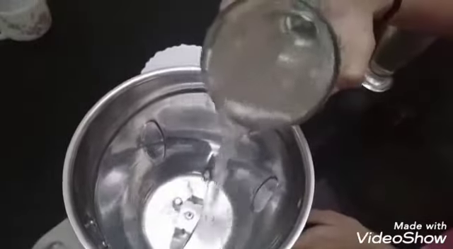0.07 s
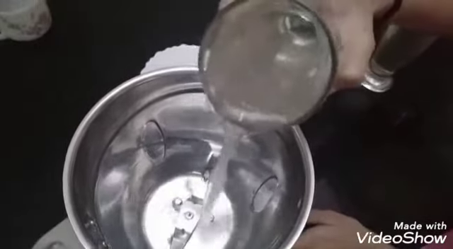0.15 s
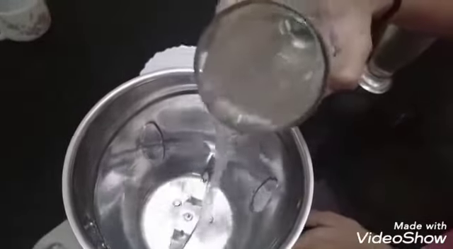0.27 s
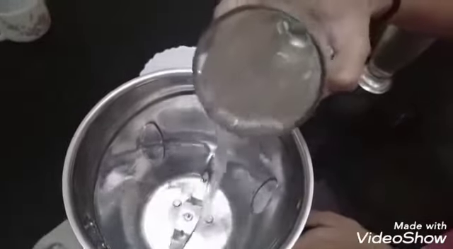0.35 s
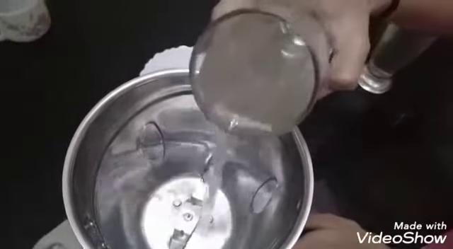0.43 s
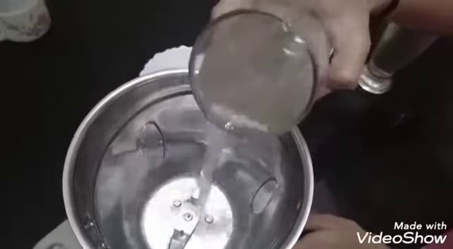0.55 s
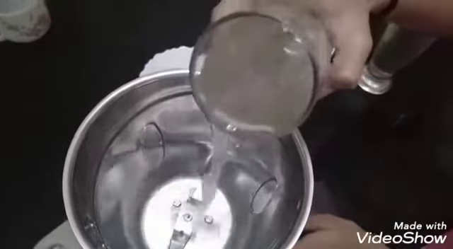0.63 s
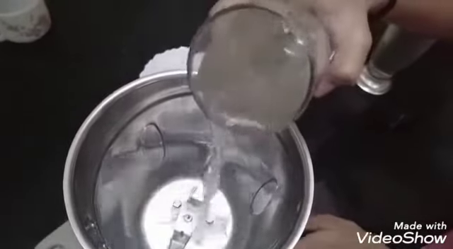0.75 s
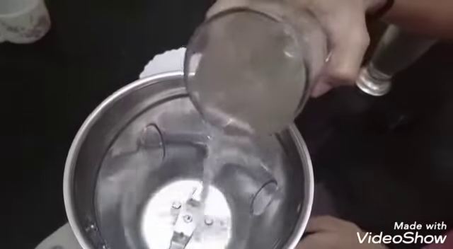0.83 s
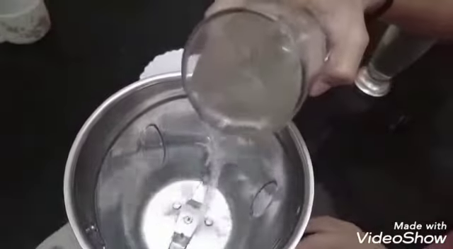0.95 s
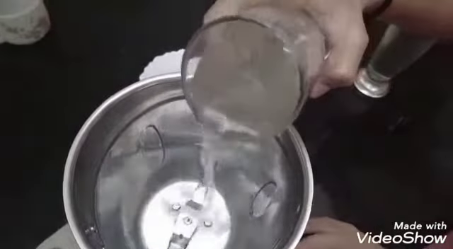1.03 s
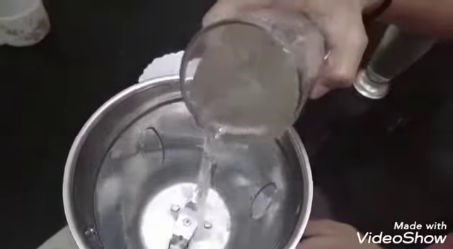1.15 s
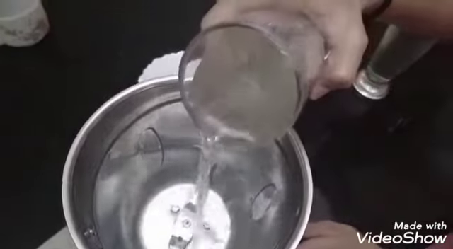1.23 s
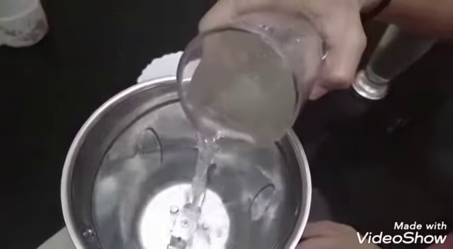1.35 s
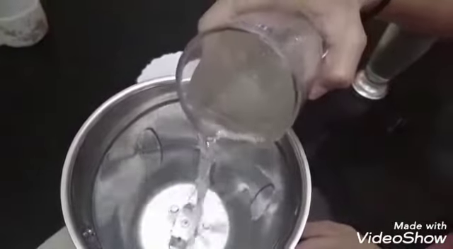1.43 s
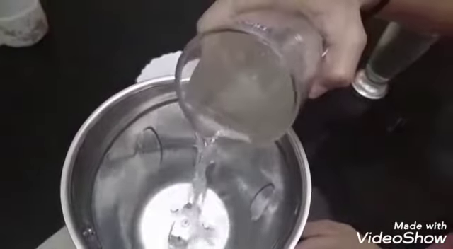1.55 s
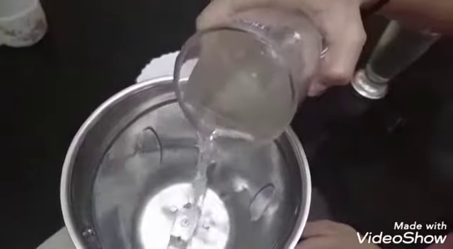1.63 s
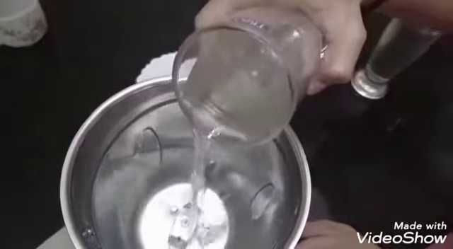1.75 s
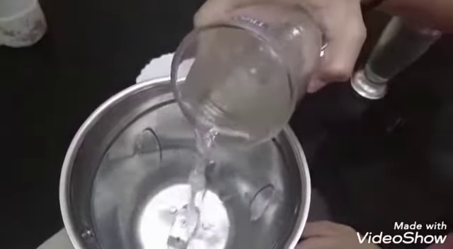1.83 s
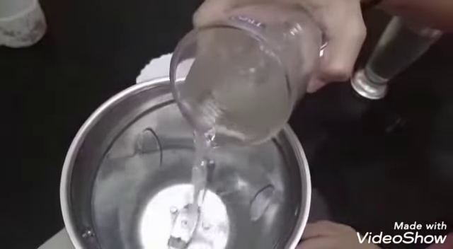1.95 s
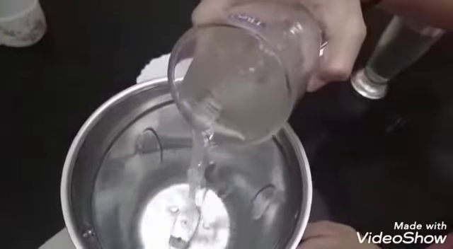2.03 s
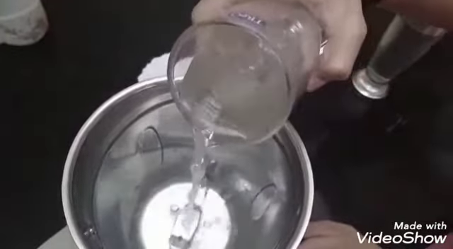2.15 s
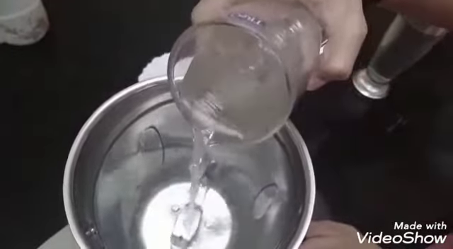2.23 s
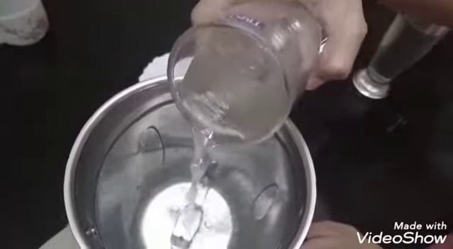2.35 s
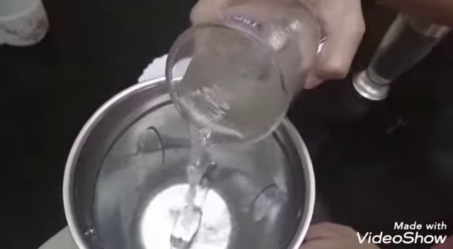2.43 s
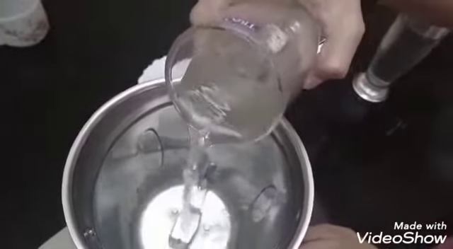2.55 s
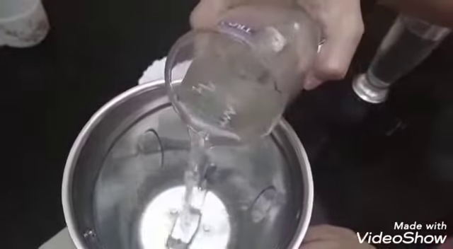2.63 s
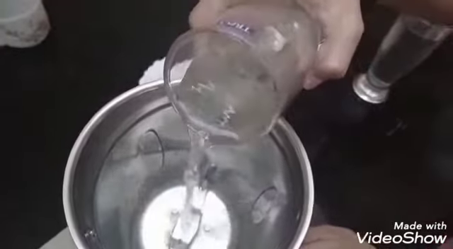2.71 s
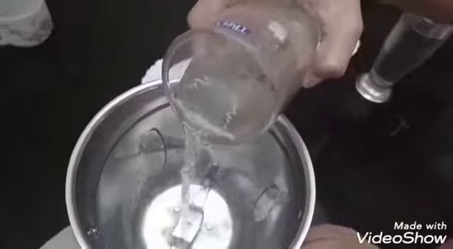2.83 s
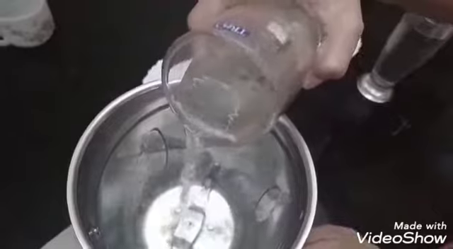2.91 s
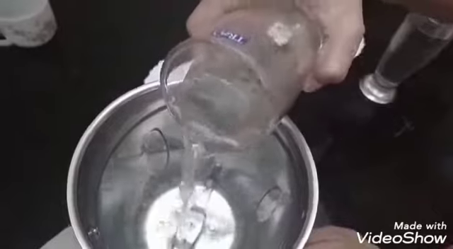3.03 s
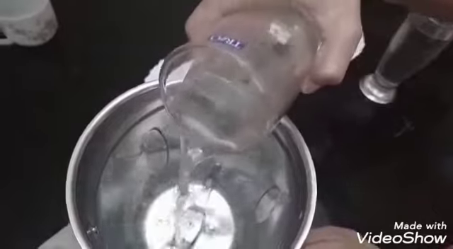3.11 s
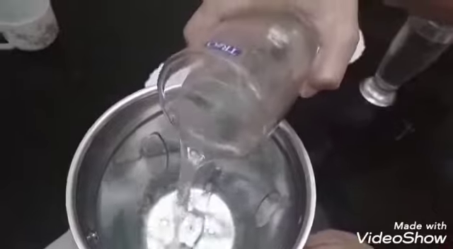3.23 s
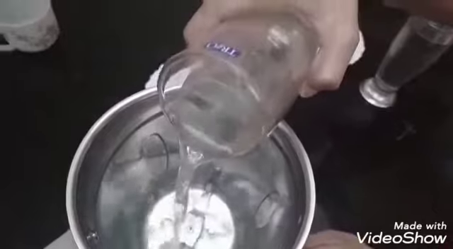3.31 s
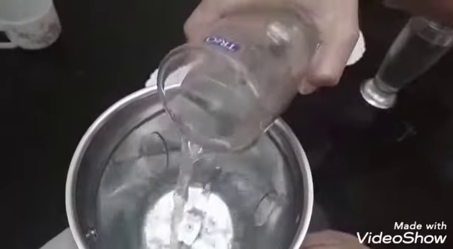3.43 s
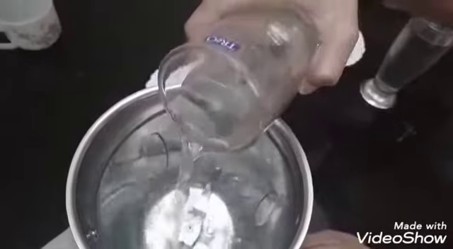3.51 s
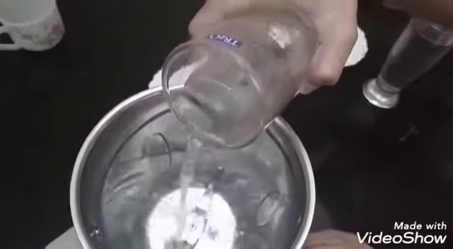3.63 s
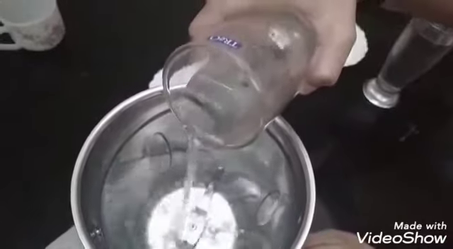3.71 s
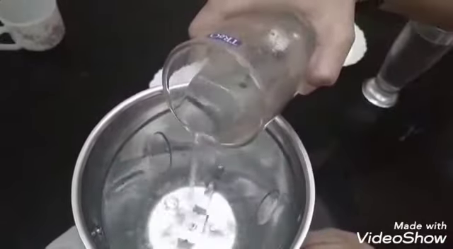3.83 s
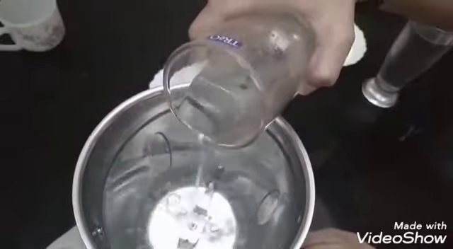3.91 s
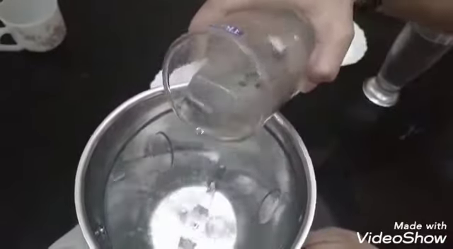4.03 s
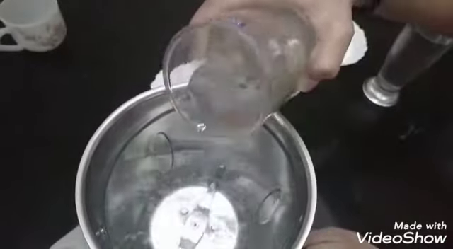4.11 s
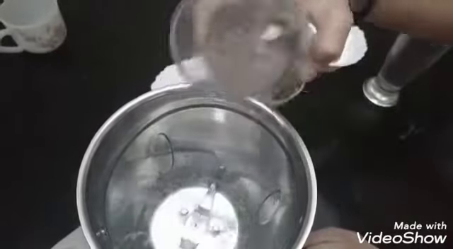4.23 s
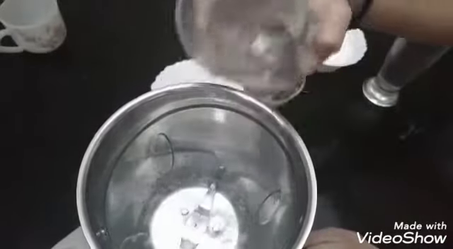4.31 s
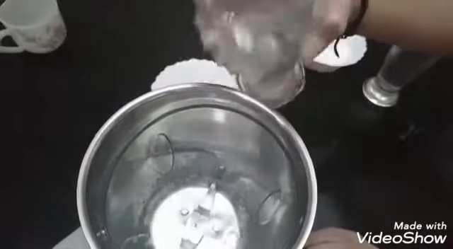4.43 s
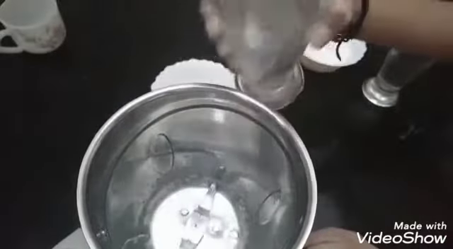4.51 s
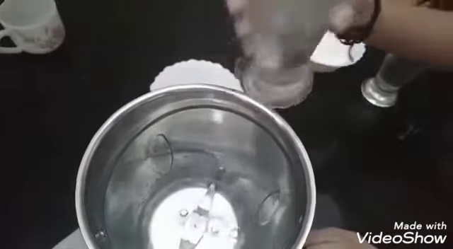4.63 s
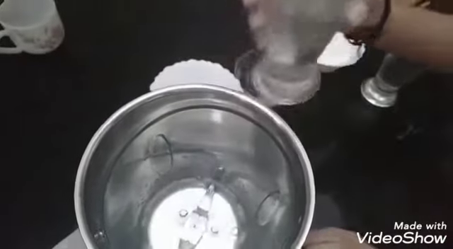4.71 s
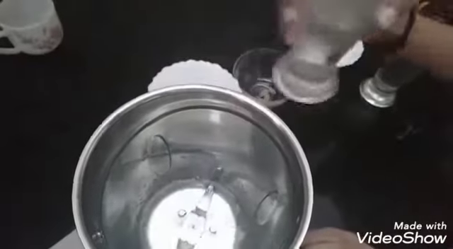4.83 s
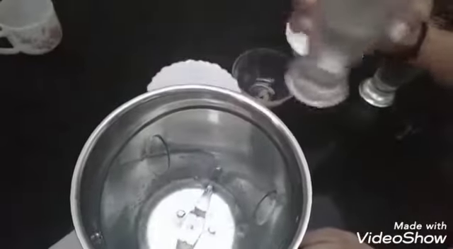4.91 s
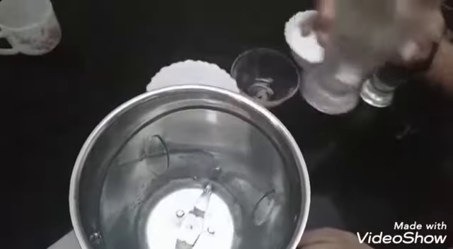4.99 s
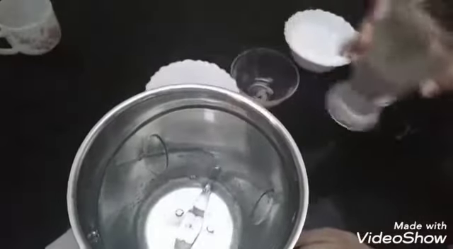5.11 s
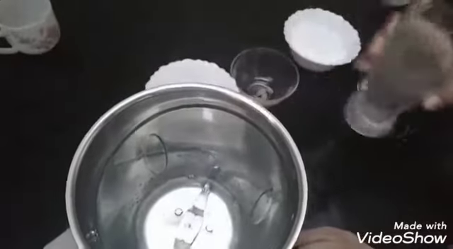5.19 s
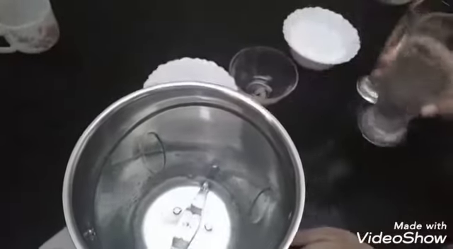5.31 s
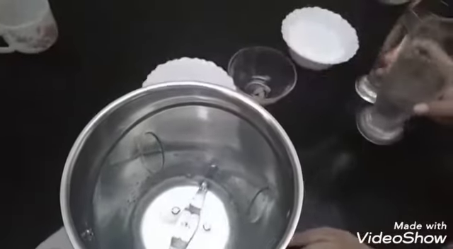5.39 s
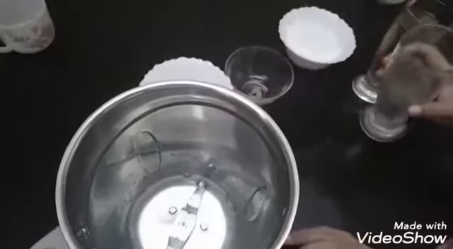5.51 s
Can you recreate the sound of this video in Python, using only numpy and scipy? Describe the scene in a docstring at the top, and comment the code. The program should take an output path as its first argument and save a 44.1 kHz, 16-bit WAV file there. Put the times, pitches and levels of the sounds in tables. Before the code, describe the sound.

Cold water pours from a glass into a steel blender jar, splashing brightly with sharp crackling bubble pops, then gulps and stops.

```python
"""Low kitchen noise and a narrow hiss run throughout. Cold water pours from a glass into a steel blender jar:
slugs and steady flow drum, splash and spray (showers of decaying sine bubbles, coloured by spectrum), while
small bubbles pop sharply and echo between the walls. Larger bubbles glide upward and the wall rings in places.
A last slug gulps, the flow dies away, tiny bubbles fizz out with a few late pops, and a soft brush follows."""
import sys
import numpy as np
from scipy import signal
from scipy.fft import rfft, irfft
from scipy.io import wavfile

SR = 44100
rng = np.random.default_rng(int(sys.argv[2]) if len(sys.argv) > 2 else 0)


def pcm_store(signal):
    """Save signal as 16-bit PCM."""
    levels = np.round(np.clip(np.atleast_2d(signal), -1, 1) * 32767)
    wavfile.write(sys.argv[1], SR, levels.astype(np.int16).T)


N = 244755
TIME = np.arange(N) / SR  # s
BINS = np.fft.rfftfreq(N, 1 / SR)  # Hz

# Room noise spectrum. Each row: frequency in Hz, relative density in dB.
ROOM_SPECTRUM = [(25, -15), (60, -17), (95, 2.5), (145, 4.5), (205, -2.5), (290, 7), (380, -2), (500, 2.5),
                 (800, -5.5), (1300, -10.5), (2300, -11.5), (3000, -9.5), (3700, -14.5), (4600, -13),
                 (5300, -61), (9000, -46)]
# Hiss spectrum. Each row: frequency in Hz, relative density in dB.
HISS_SPECTRUM = [(3000, -50), (5000, -22.5), (6200, -15.5), (6800, -2), (7300, 11.5), (7800, 10),
                 (8400, -6), (9200, -16), (10800, -21.5), (14300, -25)]
# Kitchen resonances. Each row: frequency in Hz, width in Hz, lift in dB.
KITCHEN_MODES = [(98, 10, 6), (145, 10, 5), (300, 22, 4), (484, 18, 6), (525, 18, 4), (667, 18, 7)]
# Background balance. Each row: frequency in Hz, left over right in dB.
ROOM_BALANCE = [(60, 21), (99, 14), (160, 10.5), (270, 17.5), (450, 1), (730, -2.5), (1210, 1), (2000, -4),
                (3300, -4), (5450, 7.5), (8990, 19), (14800, -1)]
# Likeness of the two channels. Each row: frequency in Hz, likeness from 0 to 1.
CHANNEL_LIKENESS = [(60, 0.86), (130, 0.5), (300, 0.89), (640, 0.29), (1300, 0), (15000, 0.07)]
# Balance of the stream. Each row: frequency in Hz, left over right in dB.
POUR_BALANCE = [(60, 6.5), (300, 9), (480, 3.5), (1000, -0.5), (3000, 0), (4500, -1), (5500, 6), (7200, 19),
                (8500, 9), (9600, -2.5), (12000, 3.5)]
# Weighting of the drumming. Each row: frequency in Hz, gain in dB.
DRUM_SPECTRUM = [(25, -8), (50, -6.5), (95, 1), (190, -3.5), (290, -1.5), (400, -4.5), (600, -4.5),
                 (900, -6), (1500, -6), (3000, -43)]
# Weighting of the splashing. Each row: frequency in Hz, gain in dB.
SPLASH_SPECTRUM = [(300, -10), (700, -4.5), (1100, -2.5), (1600, -1.5), (3200, 4), (4200, 5), (5500, -2),
                   (8000, -31), (14000, -3)]
# Weighting of the spray. Each row: frequency in Hz, gain in dB.
SPRAY_SPECTRUM = [(2500, -50), (4200, -10.5), (5200, -8.5), (6200, -2.5), (7300, 2), (8500, -1),
                  (9700, 1.5), (10700, -6), (12500, -5.5), (14300, -5.5)]
# Jar resonances. Each row: frequency in Hz, width in Hz, lift in dB.
JAR_MODES = [(1466, 90, 2), (1826, 120, 2), (2220, 90, 1), (2424, 80, 2), (2895, 90, 2), (3243, 120, 2)]
# Steady flow under the slugs. Each row: time in seconds, base splash level in dB, base spray level in dB.
STEADY_FLOW = [(0.0, -61.5, -41.5), (0.58, -56.5, -45.5), (0.81, -55.5, -42), (1.33, -44.5, -30.5),
               (1.43, -46.5, -36), (1.91, -46.5, -33.5), (2.03, -48, -37.5), (2.46, -48, -34),
               (2.67, -53.5, -43), (2.92, -55.5, -38.5), (3.04, -48, -35.5), (3.36, -44, -34),
               (3.68, -40, -27.5), (3.95, -41, -30), (4.09, -39.5, -28.5), (4.2, -55.5, -42),
               (4.4, -57, -47.5)]
# Slugs from the wavering glass; the first row is a splash already dying away as the sound begins. Each row:
# start in seconds, hold in seconds, splash gain in dB, # gain of the thump on the bottom in dB.
WATER_SLUGS = [(-0.01, 0.0086, -47, -49), (0.204, 0.02, -52.5, -70), (0.425, 0.055, -52, -49),
               (0.667, 0.072, -47.5, -47), (0.787, 0.022, -51, -42.5), (0.895, 0.041, -45, -40.5),
               (1, 0.059, -48, -41), (1.098, 0.049, -51, -44), (1.153, 0.044, -49.5, -44),
               (1.26, 0.039, -38.5, -37), (1.308, 0.021, -34, -41), (1.369, 0.098, -39.5, -41),
               (1.505, 0.068, -40, -45), (1.59, 0.032, -45.5, -43.5), (1.667, 0.086, -48, -42.5),
               (1.759, 0.041, -33.5, -48), (1.798, 0.023, -35, -40), (1.849, 0.043, -38.5, -46.5),
               (1.985, 0.079, -44.5, -50.5), (2.221, 0.071, -40, -35.5), (2.35, 0.025, -53, -47.5),
               (2.413, 0.02, -46, -41.5), (2.548, 0.063, -47.5, -45.5), (2.969, 0.06, -45, -41.5),
               (3.064, 0.057, -56, -44.5), (3.175, 0.18, -38.5, -39.5), (3.391, 0.1, -38, -40),
               (3.573, 0.022, -36, -37.5), (3.625, 0.054, -33.5, -41.5), (3.685, 0.1, -38, -41),
               (4.036, 0.025, -36.5, -36)]
# Loudest small bubbles bursting. Each row: start in seconds, peak of the channel mean in dB, pitch in Hz,
# left over right in dB.
LOUD_POPS = [(0.155, -25.5, 8150, 10.0), (0.2082, -21, 7770, 8), (0.2662, -22, 8200, 5.5),
             (0.3359, -16, 7420, 15), (0.4334, -16.5, 9600, 3), (0.4404, -18, 6290, -1),
             (0.472, -15.5, 7620, 17), (0.4836, -21, 7900, 7), (0.5125, -17, 9600, -1),
             (0.6554, -20, 8480, 5.0), (0.6911, -9.5, 7660, 6.0), (0.7193, -17.5, 10560, 9),
             (0.7332, -22, 8000, 8.5), (0.7567, -29, 7500, 6.5), (0.7781, -19.5, 7640, 8),
             (0.7865, -17, 6870, 11), (0.7906, -18, 9100, 4), (0.8611, -3, 7720, 12),
             (0.896, -4.5, 9600, 0.0), (0.9175, -12.5, 7300, 15), (0.9537, -19.5, 5900, 5.5),
             (0.9755, -3.5, 7400, 6), (1.0114, -14, 9570, -1), (1.0822, -1.5, 8880, 9),
             (1.1004, -19, 7000, 9.5), (1.1518, -9.5, 8000, 15), (1.1979, -9, 6900, 22),
             (1.251, -4.5, 7630, 2), (1.272, -15, 5600, 11), (1.272, -5, 7220, 5.5),
             (1.316, -12, 9400, 3.5), (1.326, -9, 9400, 4.0), (1.3435, -13, 9660, 6),
             (1.3748, -11, 9230, 1), (1.3742, -6, 7350, 14), (1.4268, -4, 7300, 20), (1.4548, -8, 6940, 14),
             (1.486, -0.5, 7420, 11), (1.486, 1, 8300, 7), (1.501, -11, 7240, 11), (1.509, -7, 8500, 8.5),
             (1.566, -6.5, 8440, 13), (1.5813, -4, 7740, 10), (1.6414, -20, 7900, 6.5),
             (1.6465, -2.5, 9830, 7.5), (1.702, -11.5, 9640, 2.5), (1.763, -16, 7250, 15),
             (1.7885, -10, 7700, 11), (1.8013, -7, 8800, 4.5), (1.8229, -7.5, 7770, 16),
             (1.8776, -12, 7270, 12), (2.0359, -9.5, 6800, 20), (2.0547, -21, 7640, 10),
             (2.1934, -5, 8440, 7), (2.2155, -7.5, 9830, 1), (2.2344, -6, 6140, 21),
             (2.2745, -7.5, 7550, 16), (2.4161, -6.5, 7440, 5), (2.557, -1.5, 7570, 8),
             (2.671, -21, 7800, 16), (2.905, -6, 8000, 11), (2.9552, -10, 8630, 3), (3.0006, -9.5, 8380, 6),
             (3.233, -12, 6900, 12), (3.297, -8.5, 9600, -2), (3.3677, -22, 10100, 5.0),
             (3.466, -8.5, 7250, 15), (3.496, -5, 7400, 18), (3.6898, -5, 6870, 16),
             (3.751, -10.5, 6900, 8), (3.905, -9, 7960, 6), (4.0056, -18, 6910, 18),
             (4.019, -4.5, 7360, 9.5), (4.0215, -0.5, 7440, 9), (4.0514, -12, 7240, 12),
             (4.0656, -5.5, 6300, 6), (4.118, -19.5, 7800, 9), (4.2771, -9.5, 6540, 8),
             (4.35, -29, 6770, 15.0), (4.7299, -23.5, 8300, 11), (4.76, -25.5, 7480, 14.0),
             (4.9031, -20, 8530, 9)]
# Large bubbles dragged under by a surge. Each row: time of fullest swell in seconds, level in dB,
# pitch in Hz, rise in octaves per cycle, ring time in cycles.
LARGE_BUBBLES = [(1.2938, -22.5, 1280, 0.059, 6.4), (1.319, -18, 2400, 0.025, 4.3),
                 (1.332, -16.5, 2650, 0.032, 3.1), (1.779, -17, 3700, 0.02, 2.7),
                 (1.794, -28, 1410, 0.087, 3), (1.824, -23, 1020, 0.09, 2), (1.867, -17, 2520, 0.0045, 4.5),
                 (1.978, -25.5, 1740, 0.031, 3), (3.591, -16, 2600, 0.027, 2.5),
                 (3.6556, -11, 2730, 0.065, 2), (3.9623, -17, 3220, 0.015, 4.2)]
# Drops on the bare steel. Each row: start in seconds, level in dB.
STEEL_DROPS = [(1.426, -18.5), (1.482, -19.5), (2.267, -19.5), (2.417, -10.5), (2.974, -22), (3.674, -32),
               (3.93, -21.5), (4.024, -19), (4.041, -13)]
# Weighting of the brush. Each row: frequency in Hz, gain in dB.
RUSTLE_SPECTRUM = [(2000, -28), (4500, -1), (7000, 4), (9000, -1), (12000, -42)]

FLOW_START_S, FLOW_FADE_S, FLOW_FADE_DB_PER_S = 0.205, 4.29, 36
SPLASH_DB, SPRAY_DB, DRUM_DB = 0.5, -1, -1.5  # against the flow; drumming follows splashing
CUSHION_DB_PER_S = 1.5  # the deepening pool softens the steady drumming
SLUG_ATTACK_S, SLUG_RELEASE_S = 0.011, 0.02
SLUG_SPRAY_DB = -4  # a slug throws less spray for its splash than the steady flow
FULL_SPRAY_DB, MIN_SHARE = -31, 0.5  # a weaker flow makes fewer bubbles, down to this share
SPLASH_WET_DB, SPLASH_T60_S = -2, 0.035
DROPLETS_DB = -2  # stray droplets in the spray mix
WALL_HZ = 4687
WALL_DB, WALL_DB_PER_S = -13.5, 2.5  # against splashing; the stream shakes it more as the glass tips
STREAM_END_S, DULL_FROM_S, DULL_S, DULL_HZ = 4.13, 2.86, 1.8, 10800
GURGLE_DB, GURGLE_DB_PER_S = -13.5, 2  # against splashing; more as the pool deepens
POP_PEAK_DELAY_S, POP_RISE_S, POP_RING_S = 0.002, 0.00017, 0.00017
POP_FAR_DB, POP_FAR_T60_S = -16, 0.2
SMALL_PER_S, SMALL_DB, SMALL_SPREAD_DB = 26, 11, 1.5
SMALL_FOLLOW_DB_PER_DB = 1  # pop level per dB of spray
SMALL_HZ, SMALL_SPREAD_OCT = 7970, 0.23
EDGE_HZ = 14400


def amp(db):
    """Decibels to gain."""
    return 10 ** (np.asarray(db) / 20)


def unit(x):
    """Scales to rms 1."""
    return x / np.sqrt(np.mean(x ** 2) + 1e-20)


def along(points):
    """Interpolates a table over log frequency at every bin."""
    hz, value = np.transpose(points)
    return np.interp(np.log(BINS + 1), np.log(hz + 1), value)


def lifts(modes):
    """Sums the decibels that resonances add at every bin."""
    return sum(db / (1 + (2 * (BINS - hz) / width_hz) ** 2) for hz, width_hz, db in modes)


def colour(pair, shape_db, balance):
    """Weights the spectra of two unrelated signals and sets their likeness and balance; mean has deviation 1."""
    left, other = rfft(pair)
    same = np.clip(along(CHANNEL_LIKENESS), -1, 1)
    right = same * left + np.sqrt(1 - same ** 2) * other
    ratio = amp(along(balance))
    spectra = np.array([ratio * left, right]) / np.hypot(ratio, 1)
    out = irfft(spectra * amp(shape_db), N)
    return out / np.std(out.mean(0))


def add(mix, start_s, sound):
    """Mixes a stereo sound in at a time."""
    part = mix[:, max(round(start_s * SR), 0):][:, :sound.shape[1]]
    part += sound[:, :part.shape[1]]


def echoes(t60_s, size=4000):
    """Dense decaying reflections between steel walls, different in each channel, energy 1."""
    t = np.arange(size) / SR
    tail = rng.standard_normal((2, size)) * amp(-60 * t / t60_s) * (t > .0006)
    return tail / np.linalg.norm(tail, axis=1, keepdims=True)


def in_jar(x, wet_db, t60_s):
    """Direct sound plus its echoes in the jar."""
    return x + amp(wet_db) * signal.oaconvolve(x, echoes(t60_s), axes=1)[:, :N]


def bubble(hz, phase_turns, cycles, glide, size):
    """An air pocket swells into ringing, rises a little in pitch and dies away."""
    age = (TIME[:size] * hz / max(cycles, .3)).astype(np.float32)
    pitch_hz = hz * (1 + glide * (np.minimum(age, 4) - 1))
    turns = np.cumsum(pitch_hz / SR, axis=-1) + phase_turns
    return age * np.exp(1 - age) * np.sin(2 * np.pi * turns.astype(np.float32))


def patter(per_s, spread_db, low_hz, high_hz, cycles, size=300, thinning=1, glide=0.062):
    """A shower of bubbles of random pitch and size; a weak flow breaks into fewer unless thinning is 0."""
    when, pitch, bulk, phase, luck, tilt, flip = rng.random((int(per_s * N / SR), 7)).T
    share = np.clip(amp(thinning * (flow(when * N / SR)[1] - FULL_SPRAY_DB)), MIN_SHARE, 1)
    weight = amp(spread_db * np.minimum(-np.log(1 - bulk), 3.5)) / np.sqrt(share)
    keep = luck < share
    hz = low_hz * (high_hz / low_hz) ** pitch[keep, None]
    grains = hz * weight[keep, None] * bubble(hz, phase[keep, None], cycles, glide, size)
    where = ((when[keep, None] * N).astype(int) + np.arange(size)).ravel() % N
    lean = tilt[keep, None] - .5
    polarity = np.sign(flip[keep, None] - .5)
    sides = (1 + lean, polarity * (1 - lean))
    return unit(np.array([np.bincount(where, (grains * side).ravel(), N) for side in sides]))


def gusts(per_s):
    """Smooth random wavering of rms 1: the stream breaks into lumps."""
    return unit(irfft(rfft(rng.standard_normal(N)) * np.exp(-(BINS / per_s) ** 2), N))


def background(room_db=-50, hiss_db=-46.5):
    """Low kitchen noise and a narrow, steady hiss, both shaped from white noise."""
    room = colour(rng.standard_normal((2, N)), along(ROOM_SPECTRUM) + lifts(KITCHEN_MODES), ROOM_BALANCE)
    hiss = colour(rng.standard_normal((2, N)), along(HISS_SPECTRUM), ROOM_BALANCE)
    return amp(room_db) * room + amp(hiss_db) * hiss


def flow(t):
    """Base splash and spray levels in dB: 14 dB lower before the flow starts, dying away at the end."""
    s, *levels_db = np.transpose(STEADY_FLOW)
    before_db = np.where(t < FLOW_START_S, -14, 0)
    fade_db = before_db - FLOW_FADE_DB_PER_S * np.maximum(t - FLOW_FADE_S, 0)
    return [np.interp(t, s, level_db) + fade_db for level_db in levels_db]


def slugs():
    """Gains of splash and thump: each slug lands quickly, holds while it falls and dies away."""
    splash, thump = np.zeros((2, N))
    for start_s, hold_s, splash_db, thump_db in WATER_SLUGS:
        attack = np.clip((TIME - start_s) / SLUG_ATTACK_S, 0, 1)
        shape = attack * np.exp(-np.maximum(TIME - start_s - hold_s, 0) / SLUG_RELEASE_S)
        splash += amp(splash_db) * shape
        thump += amp(thump_db) * shape
    return splash, thump


def churn(x, patchy_db, width_hz, length_s):
    """The shifting water surface favours ever-changing patches of pitch."""
    hz, t, z = signal.stft(x, SR, nperseg=256, noverlap=192)
    field = rng.standard_normal(z.shape[1:])
    across = np.exp(-((hz - hz.mean()) / width_hz) ** 2)
    during = np.exp(-((t[:41] - t[20]) / length_s) ** 2)
    field = unit(signal.fftconvolve(field, np.outer(across, during), "same"))
    out = signal.istft(z * amp(patchy_db * field), SR, nperseg=256, noverlap=192)[1]
    return unit(out[:, :N])


def drumming():
    """Water drums on the bottom: short low bubbles, with longer air pockets burbling."""
    hits = patter(per_s=2000, spread_db=1.0, low_hz=115.0, high_hz=1320, cycles=0.28, size=600, thinning=0)
    burble = patter(per_s=110, spread_db=1.5, low_hz=229.5, high_hz=918, cycles=2.17, size=2400, thinning=0)
    return colour(hits + amp(-4) * burble, along(DRUM_SPECTRUM) + lifts(KITCHEN_MODES), POUR_BALANCE)


def splashing():
    """Water splashes in the pool: short bubbles, with larger ones ringing on."""
    short = patter(per_s=1600, spread_db=-0.5, low_hz=608, high_hz=10900, cycles=0.41)
    ringing = patter(per_s=800, spread_db=0.0, low_hz=811, high_hz=6050, cycles=4.1, size=800)
    splash = in_jar(short + amp(-7.0) * ringing, SPLASH_WET_DB, SPLASH_T60_S)
    splash = churn(splash, patchy_db=3.0, width_hz=220, length_s=0.032)
    return colour(splash, along(SPLASH_SPECTRUM) + lifts(JAR_MODES), POUR_BALANCE)


def spraying():
    """Droplets tick on the wall, tiny bubbles fizz and stray droplets tick sharply."""
    ticks = patter(per_s=2800, spread_db=3.0, low_hz=3690, high_hz=14000, cycles=0.71, thinning=0)
    fizz = patter(per_s=1500, spread_db=5.0, low_hz=4700, high_hz=15000, cycles=2.13)
    stray = patter(per_s=160, spread_db=5.5, low_hz=5560, high_hz=13000, cycles=0.46, size=100)
    spray = in_jar(amp(2.5) * ticks + fizz, wet_db=2.5, t60_s=0.058) / 2
    spray = spray + amp(DROPLETS_DB) * in_jar(stray, wet_db=-3.5, t60_s=0.03)
    spray = churn(spray, patchy_db=4.0, width_hz=180, length_s=0.0029)
    return colour(spray, along(SPRAY_SPECTRUM) + lifts(JAR_MODES), POUR_BALANCE)


def wall_ring(splash, width_hz=90, fitful_db=5, fits_per_s=16):
    """The splashing fitfully catches the steel wall and sets its note ringing."""
    ring = irfft(rfft(splash) / (1 + 2j * (BINS - WALL_HZ) / width_hz) ** 2, N)
    return unit(ring * amp(fitful_db * gusts(fits_per_s))) * amp(WALL_DB + WALL_DB_PER_S * TIME)


def dulled(spray):
    """The pool swallows the droplets: crossfades the spray to a low-passed copy."""
    dull = irfft(rfft(spray) / (1 + (BINS / DULL_HZ) ** 8), N)
    return spray + np.clip((TIME - DULL_FROM_S) / DULL_S, 0, 1) * (dull - spray)


def stream():
    """Lumps of water drum on the bottom, splash in the pool and throw spray at the wall."""
    splash_db, spray_db = flow(TIME)
    slug, thump = slugs()
    lumps = gusts(per_s=25)
    splash = splashing()
    drum_gain = np.hypot(amp(splash_db + DRUM_DB - CUSHION_DB_PER_S * TIME), thump)
    splash_gain = np.hypot(amp(splash_db + SPLASH_DB), slug)
    slug_spray = amp(spray_db - splash_db + SLUG_SPRAY_DB) * slug
    spray_gain = np.hypot(amp(spray_db + SPRAY_DB), slug_spray)
    return (drumming() * drum_gain * amp(0.3 * lumps)
            + (splash + wall_ring(splash)) * splash_gain * amp(0.48 * lumps)
            + dulled(spraying()) * spray_gain * amp(2.25 * lumps))


def gurgling():
    """The deepening pool swallows more and more large bubbles, a dense, rough crowd."""
    bubbles = patter(per_s=300, spread_db=2.5, low_hz=1306, high_hz=2430, glide=0.066, cycles=4.45, size=900)
    bubbles = colour(in_jar(bubbles, SPLASH_WET_DB, SPLASH_T60_S), lifts(JAR_MODES), POUR_BALANCE)
    splash_gain = np.hypot(amp(flow(TIME)[0]), slugs()[0])
    return bubbles * splash_gain * amp(GURGLE_DB + GURGLE_DB_PER_S * TIME)


def pop(hz, side_db, glide=0.0336, snap_db=-20, snap_s=0.004, near_db=-8, near_t60_s=0.016):
    """One bubble swells, snaps and rattles between the walls; the channel mean peaks at 1."""
    bright = signal.butter(3, [6500, 11500], "band", fs=SR, output="sos")
    t = TIME[:900] - POP_PEAK_DELAY_S
    swell = np.exp(-np.logaddexp(-t / POP_RISE_S, t / POP_RING_S))
    turns = np.cumsum(hz * (1 + glide * np.tanh(t / POP_RING_S))) / SR + rng.random()
    # a quarter turn apart in the two channels
    ring = swell * np.array([np.cos(2 * np.pi * turns), np.sin(2 * np.pi * turns)])
    snap_shape = np.exp(-np.logaddexp(-t / POP_RISE_S, t / snap_s))
    snap = signal.sosfilt(bright, rng.standard_normal(ring.shape) * snap_shape)
    paths = amp(near_db) * echoes(near_t60_s) + amp(POP_FAR_DB) * echoes(POP_FAR_T60_S)
    paths[:, 0] = 1  # direct sound
    balance = np.array([[amp(side_db)], [1]])
    sound = balance * signal.fftconvolve(ring + amp(snap_db) * snap, paths, axes=1)
    return sound / abs(sound.mean(0)).max()


def pops():
    """The loudest small bubbles burst sharply."""
    out = np.zeros((2, N))
    for start_s, db, hz, side_db in LOUD_POPS:
        add(out, start_s, amp(db) * pop(hz, side_db))
    return out


def side_at(hz):
    """Left over right in dB that the jar gives a sound of this pitch."""
    return np.interp(hz, BINS, along(POUR_BALANCE))


def small_pops(count=160):
    """Lesser bubbles burst at random through the pour, their level following the spray."""
    out = np.zeros((2, N))
    times_s = FLOW_START_S + np.cumsum(rng.uniform(0, 2, count)) / SMALL_PER_S
    loud, pitch = rng.standard_normal((count, 2)).T
    levels_db = SMALL_FOLLOW_DB_PER_DB * flow(times_s)[1] + SMALL_DB + SMALL_SPREAD_DB * loud
    pitches_hz = SMALL_HZ * 2 ** (SMALL_SPREAD_OCT * pitch)
    for start_s, db, hz, side_db in zip(times_s, levels_db, pitches_hz, side_at(pitches_hz)):
        if start_s < STREAM_END_S:
            add(out, start_s, amp(db) * pop(hz, side_db))
    return out


def glugs():
    """A large bubble swells into ringing and glides upward as it nears the surface."""
    out = np.zeros((2, N))
    for peak_s, db, hz, rise_oct, cycles in LARGE_BUBBLES:
        turns = np.arange(-2 * cycles, 4 * cycles, hz / SR)
        swell = np.where(turns < 0, np.exp(-(turns / cycles) ** 2), 1 / np.cosh(turns / cycles))
        phase = np.cumsum(2 ** (rise_oct * np.minimum(turns, cycles))) * hz / SR
        ring = swell * np.sin(2 * np.pi * (phase + np.array([[0], [.15]])))
        add(out, peak_s - 2 * cycles / hz, amp(db) / 2 * ring)
    return in_jar(out, wet_db=-1.5, t60_s=0.081)


def pings(t60_s=0.02, rise_s=0.00013, tick_db=-6, tick_s=0.00022):
    """A drop ticks on the wet steel wall, which rings briefly on one note."""
    out, t = np.zeros((2, N)), TIME[:4000]
    fade = (1 - np.exp(-t / rise_s)) * amp(-60 * t / t60_s)
    ring = fade * np.sin(2 * np.pi * (WALL_HZ * t + np.array([[0], [.2]])))
    band = signal.butter(2, [2500, 7000], "band", fs=SR, output="sos")
    for start_s, db in STEEL_DROPS:
        tick = signal.sosfilt(band, rng.standard_normal((2, len(t))) * np.exp(-t / tick_s))
        add(out, start_s, amp(db) * (ring + amp(tick_db) * 2 * tick))
    return out


def gulp(start_s=4.044, hz=285, cycles=3.1, db=-27):
    """The last slug of water traps one big pocket of air, heard mostly on the left."""
    out = np.zeros((2, N))
    pocket = bubble(hz, rng.random(), cycles, glide=0.064, size=SR // 10)
    add(out, start_s, amp(db) * np.outer([1, .5], pocket))
    return out


def settling(db=-44, fade_db_per_s=24):
    """After the stream ends, the last tiny bubbles in the pool fizz out."""
    bubbles = patter(per_s=300, spread_db=7.0, low_hz=5700, high_hz=9100, cycles=1.4, size=500, thinning=0)
    bubbles = colour(in_jar(bubbles, SPLASH_WET_DB, SPLASH_T60_S), 0, POUR_BALANCE)
    age_s = TIME - STREAM_END_S
    return bubbles * (age_s > 0) * amp(db - fade_db_per_s * np.maximum(age_s, 0))


def rustle(centre_s=5.44, length_s=0.02, db=-51):
    """A soft brush as the hand moves the glass away: a short swell of shaped noise."""
    noise = colour(rng.standard_normal((2, N)), along(RUSTLE_SPECTRUM), POUR_BALANCE)
    return noise * amp(db) * np.exp(-((TIME - centre_s) / length_s) ** 2)


def scene():
    """The pour in the kitchen."""
    water = stream() + gurgling() + pops() + small_pops() + glugs() + pings() + gulp() + settling()
    return background() + water + rustle()


def record(dry):
    """Clips at full scale, then low-passes."""
    clipped = np.clip(dry, -1, 1)
    lowpass = signal.firwin(401, EDGE_HZ, window=("kaiser", 8), fs=SR)
    return signal.oaconvolve(clipped, lowpass[None], "same")


dry = scene()
out = record(dry)
pcm_store(out)
```